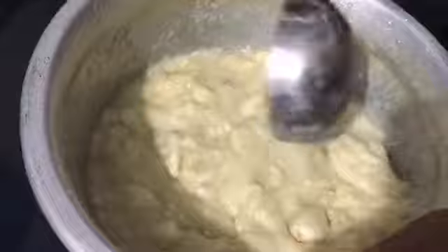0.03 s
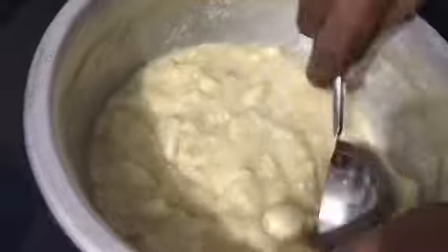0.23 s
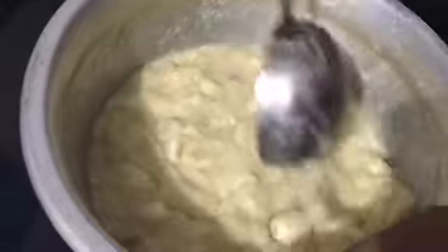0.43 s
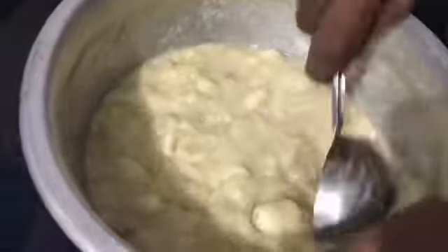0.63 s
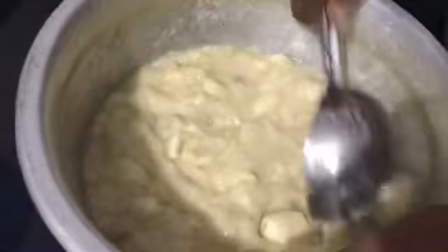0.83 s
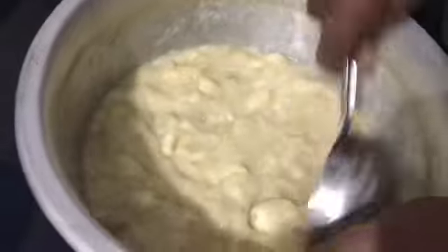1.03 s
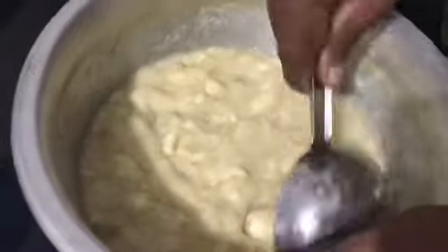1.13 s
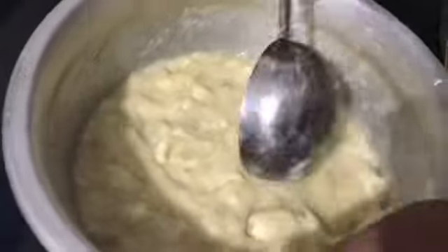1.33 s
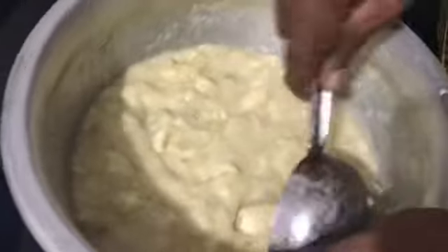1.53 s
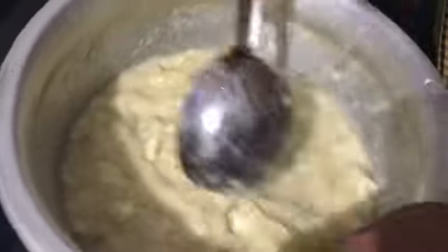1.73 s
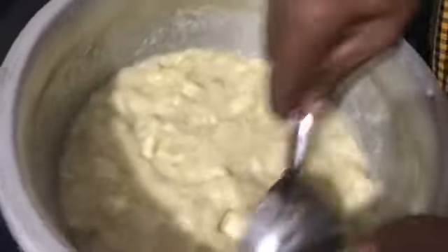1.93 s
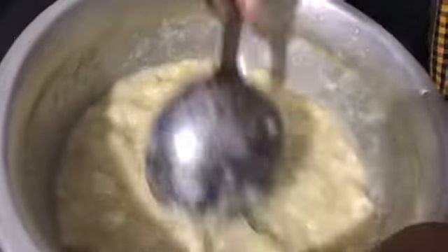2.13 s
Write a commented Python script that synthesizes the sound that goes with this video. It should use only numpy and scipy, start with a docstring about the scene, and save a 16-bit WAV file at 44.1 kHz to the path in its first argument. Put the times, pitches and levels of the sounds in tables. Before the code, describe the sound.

Close up in a small kitchen, a metal ladle strikes a filled metal pot five times as it mashes. Sticky ticks and tiny pops come between the knocks, and the ladle briefly skids along the wall, over a low rumble.

```python
"""A steel ladle mashes a soft mixture in a metal pot, five strokes, close by in a small kitchen.
Over a low rumble and faint hiss, the mash ticks and smacks. Each stroke ends in a knock that the
filling damps quickly; from the second on, the edge also clacks on the bare wall at times.
Around the third, an arm pushes air by and the edge slides lightly down the wall.
The fourth skids along the wall. An air pocket pops after it, and another after the fifth."""
import sys
import numpy as np
from scipy import signal
from scipy.fft import rfft, irfft
from scipy.io import wavfile
from scipy.ndimage import uniform_filter1d

SR = 44100
rng = np.random.default_rng(int(sys.argv[2]) if len(sys.argv) > 2 else 0)


def to_wav(s):
    """Save 16-bit WAV."""
    ch = np.atleast_2d(s).T  # columns
    pcm = np.round(np.clip(ch, -1, 1) * 32767)  # PCM
    wavfile.write(sys.argv[1], SR, pcm.astype(np.int16))


N = 97020
T = np.arange(N) / SR

# modes of the filled pot and of the ladle: (frequency [Hz])
POT_HZ = [278, 370, 620, 678, 886, 1026, 1148, 1214, 1258, 1380, 1523]
LADLE_HZ = [1916, 2355, 2610, 2715, 2940, 3290, 3880, 4500, 5380, 5860, 8818]
# the same modes: (relative strength [dB], t60 [s])
POT_MODES = [(-8, 0.095), (-14, 0.094), (1, 0.07), (-12.5, 0.11), (-5.5, 0.056), (5, 0.059), (0.5, 0.16),
             (1.5, 0.087), (-3, 0.29), (-2, 0.22), (0, 0.069)]
LADLE_MODES = [(-5, 0.04), (5, 0.054), (0, 0.08), (0, 0.036), (1, 0.066), (-6.5, 0.084), (0.5, 0.044),
               (2, 0.02), (-4.5, 0.029), (0, 0.006), (6, 0.017)]


def amp(db):
    """Decibels to gain."""
    return 10 ** (np.asarray(db) / 20)


def unit(x):
    """Scale to rms 1."""
    return x / np.sqrt(np.mean(x ** 2) + 1e-20)


def read(points, hz):
    """Interpolate a spectrum table over log frequency."""
    f, value = np.transpose(points)
    return np.interp(np.log(hz + 1), np.log(f + 1), value)


def fade(times_s, levels_db):
    """Gain curve, silent outside its points."""
    return amp(np.interp(T, times_s, levels_db, left=-120, right=-120))


def add(mix, at_s, sound):
    """Mix a sound in, in place."""
    part = mix[round(at_s * SR):][:len(sound)]
    part += sound[:len(part)]


def colour(x, points, size=4096):
    """Minimum-phase filter from (frequency [Hz], gain [dB]) points."""
    log_gain = np.log(amp(read(points, abs(np.fft.fftfreq(size, 1 / SR)))))
    taps = np.fft.ifft(np.exp(np.conj(signal.hilbert(log_gain)))).real
    return signal.fftconvolve(x, taps[:size // 2])[:len(x)]


def noise(points):
    """Steady shaped noise, rms 1."""
    gain = amp(read(points, np.fft.rfftfreq(N, 1 / SR)))
    return unit(irfft(rfft(rng.standard_normal(N)) * gain, N))


def boost(x, hz, db, width_hz):
    """Raise one resonance."""
    return x + (amp(db) - 1) * signal.lfilter(*signal.iirpeak(hz, hz / width_hz, fs=SR), x)


def background(level_db=-44.5):
    """Steady low rumble and faint hiss."""
    # (frequency [Hz], relative density [dB])
    spectrum = [(15, 19), (30, 22.5), (65, 18), (110, 8), (200, 7), (400, 3.5), (800, 0), (1600, -3),
                (2500, -8), (3150, 2), (3900, -10.5), (7000, -16.5), (8800, -14), (10000, -23.5),
                (16000, -25)]
    return amp(level_db) * noise(spectrum)


def chatter(decay_s, rise_s=0.001, echo_above_hz=1870, size=16384):
    """A contact and a dying flurry of tiny ones, bouncing across the pot; energy 1."""
    # paths across the pot, varied per contact: (delay [s], gain [ratio])
    echoes = [(.0008, 0.51), (.00175, 0.93), (.0058, 0.32)]
    t = np.arange(size) / SR
    first_contact = 1 + 2 * np.exp(-t / 0.00024)
    envelope = np.exp(-t / decay_s) * first_contact * (1 - np.exp(-t / rise_s))
    spectrum = rfft(rng.standard_normal(size) * envelope)
    whitened = irfft(spectrum / (abs(spectrum) + 1e-9))
    direct = whitened * np.exp(-t / (10 * decay_s))
    treble = signal.lfilter(*signal.butter(2, echo_above_hz, "high", fs=SR), direct)
    burst = direct.copy()
    for delay_s, gain in echoes:
        add(burst, delay_s * rng.uniform(.8, 1.2), gain * treble)
    return burst / np.linalg.norm(burst)


def mash(pop_rise_s=0.00023, glide_per_s=6.2, octave_db=-13):
    """The sticky mash ticks; air pockets pop with rising pitch."""
    # wet ticks: (time [s], level at each of bands_hz [dB])
    smacks = [(0.0751, -29, -23, -5.5), (0.0837, -8, -5.5, -12), (0.2359, -23, -6, -6),
              (0.406, -11, -19, -33), (.419, -1.5, -43, -44), (.501, -30, -28, -19.5),
              (1.517, -13, -7, -16), (1.772, -21, -21, -21.5), (1.816, -9, -7, -25), (1.827, 0, -2.5, -27),
              (1.958, -5, -35, -10)]
    bands_hz = [1000, 3800, 11000]
    # air pockets: (time [s], start pitch [Hz], level [dB], t60 [s])
    pops = [(1.5635, 1677, -23, 0.02), (1.9418, 1414, -21, 0.021)]
    out, t = np.zeros(N), np.arange(SR // 10) / SR
    for at_s, *bands_db in smacks:
        tick = chatter(decay_s=0.0016, rise_s=0.0001)
        add(out, at_s, colour(tick, list(zip(bands_hz, bands_db))))
    for at_s, hz, db, t60_s in pops:
        phase = 2 * np.pi * hz * t * (1 + glide_per_s * t / 2)
        tone = np.sin(phase) + amp(octave_db) * np.sin(2 * phase)
        envelope = (1 - np.exp(-t / pop_rise_s)) * amp(db - 60 * t / t60_s)
        add(out, at_s, envelope * tone)
    return out


def ring(modes_hz, modes, place_rad, place_depth_db=3.5, size=16384):
    """Dying metal modes, energy 1; the place of the blow favours some."""
    t = np.arange(size) / SR
    tone = np.zeros(size)
    for k, (hz, (db, t60_s)) in enumerate(zip(modes_hz, modes)):
        strength_db = db + place_depth_db * np.cos(k * place_rad)
        envelope = amp(strength_db - 60 * t / t60_s) / np.sqrt(t60_s)
        tone += (-1) ** k * envelope * np.sin(2 * np.pi * hz * t)
    return tone / np.linalg.norm(tone)


def knocks(gain_db=-3, pot_db=-11, ladle_db=-7, bass_corner_hz=266, bass_db_per_octave=10):
    """The ladle hits the pot through the mash; each blow chatters and rings both."""
    # (time [s], rise [s], chatter decay [s], pot ring [dB], ladle ring [dB], place on wall [rad],
    # thud [Hz], belly [dB], wall note [Hz], wall note [dB], clink [Hz], clink [dB],
    # gain at each of bands_hz [dB])
    blows = [ (0.1614, 0.00039, 0.0027, -2, -3.5, 1.73, 374, 7, 1140, 5.2, 4470, 9.9, 14, 22.2, 26, 3, 11.5, 8),
             (0.567, 0.0018, 0.0023, -1.5, -16, 0.9, 385, 2, 1166, 8.7, 4330, 6.7, 16.5, 18.8, 17.9, 9.1, 5.5, 7.5),
             (0.9906, 0.00054, 0.0019, -1, -19, 3.1, 270, 2, 1260, 2.9, 5350, 2.7, 18, 13, 16.4, 2, 10, 0.5),
             (1.0058, 0.00038, 0.0035, -5, -16, 3.1, 274, -1.5, 1000, 4, 2900, 7.2, 8.4, 16.6, 16.8, 2, -13, -0.5),
             (1.3858, 0.0046, 0.0042, 4.5, -4.5, 2.64, 280, 5, 1240, 2.9, 4380, 6.1, 17.8, 9.9, 15.2, 15, 17, 12.5),
             (1.8380, 0.00042, 0.004, -0.5, -1.5, 1.4, 322, 0, 990, 10.4, 4070, 9, 25.1, 19.2, 23.1, 13.8, 13, 12)]
    bands_hz = [330, 660, 1300, 2200, 4700, 12000]
    # broad response of the filled pot: (frequency [Hz], gain [dB])
    pot_body = [(140, 9.5), (200, -8), (280, -2.5), (390, 1.5), (480, -4.5), (630, 5.5), (830, -0.5),
                (1040, 6), (1300, 2), (1580, 4.5), (2050, -4), (2750, 2.5), (3450, -6), (5500, 0.5),
                (7300, -1.5), (16000, 1.5)]
    out = np.zeros(N)
    for (at_s, rise_s, decay_s, pot_ring_db, ladle_ring_db, place_rad,
         thud_hz, belly_db, note_hz, note_db, clink_hz, clink_db, *bands_db) in blows:
        blow = colour(chatter(decay_s, rise_s), pot_body)
        # resonances vary with the point of contact
        blow = boost(blow, hz=663.5, db=belly_db, width_hz=50)
        blow = boost(blow, thud_hz, db=7, width_hz=68)
        blow = boost(blow, note_hz, note_db, width_hz=84)
        blow = boost(blow, clink_hz, clink_db, width_hz=193)
        blow += amp(pot_db + pot_ring_db) * ring(POT_HZ, POT_MODES, place_rad)
        blow += amp(ladle_db + ladle_ring_db) * ring(LADLE_HZ, LADLE_MODES, place_rad)
        bass = [(bass_corner_hz / 4, bands_db[0] - 2 * bass_db_per_octave),
                (bass_corner_hz, bands_db[0])]
        add(out, at_s, colour(blow, bass + list(zip(bands_hz, bands_db))))
    return amp(gain_db) * out


def clacks(place_rad=2.28):
    """Light, bright contacts of the ladle's edge with the bare wall."""
    # (time [s], chatter decay [s], ladle ring [dB], clink [Hz], gain at each of bands_hz [dB])
    contacts = [(0.54, 0.0018, -20, 1790, 4.5, -1.5, -3.5), (0.9461, 0.0024, -12.5, 1930, 4.7, 11, 1),
                (1.3812, 0.00092, -8, 3900, 6.7, 9, -11), (1.4060, 0.00097, -17, 8850, 5, -15, -11),
                (1.4290, 0.00096, -17, 5400, 2.5, -2, -11), (1.4530, 0.0052, -28, 4700, 4, -5, -12),
                (1.4615, 0.003, -12, 5400, 2, 0, -12), (1.4707, 0.0014, -12.5, 5330, 7.3, 4, -8.5)]
    bands_hz = [800, 4000, 12000]
    # response of the bare wall: (frequency [Hz], gain [dB])
    wall_body = [(150, -8), (380, -5.5), (540, 3.5), (1000, 5), (1250, -7), (1550, -8), (1880, 2.5),
                 (2150, -5), (2720, -3), (4200, 0), (5800, 2.5), (7400, -6), (9500, 1), (13000, 3.5),
                 (16000, -7)]
    out = np.zeros(N)
    for at_s, decay_s, ring_db, clink_hz, *bands_db in contacts:
        blow = colour(chatter(decay_s), wall_body)
        blow = boost(blow, clink_hz, db=10, width_hz=193)
        blow += amp(ring_db) * ring(LADLE_HZ, LADLE_MODES, place_rad)
        add(out, at_s, colour(blow, list(zip(bands_hz, bands_db))))
    return out


def buffet():
    """An arm passing close by pushes air; the pitch sinks as it swells."""
    # (time [s], deep bass level [dB], upper bass level [dB])
    swell = [(.76, -56, -43), (.78, -52, -39), (.83, -35.5, -34.5), (0.881, -28, -44), (0.928, -35, -73),
             (1.0, -55, -58), (1.108, -37, -45.5), (1.201, -67, -68)]
    # air spectra: (frequency [Hz], relative density [dB])
    deep_bass = [(15, -36), (33, -17), (48, 2), (70, -5), (150, -51), (600, -76)]
    upper_bass = [(30, -35), (80, 2), (115, 0.5), (165, -11), (240, -30), (600, -69)]
    times_s, *curves_db = np.transpose(swell)
    out = np.zeros(N)
    for levels_db, spectrum in zip(curves_db, (deep_bass, upper_bass)):
        air = noise(spectrum)
        local_rms = np.sqrt(uniform_filter1d(air ** 2, size=1400) + 0.03)
        out += fade(times_s, levels_db) * unit(air / local_rms)
    return out


def slips(rate_per_s=450, spread_db=5.5):
    """Dense train of tiny, uneven stick-slip jolts."""
    signs = rng.choice([-1, 1], N)
    sizes = amp(spread_db * np.minimum(rng.exponential(1, N), 3))
    return signs * sizes * (rng.random(N) < rate_per_s / SR)


def slide():
    """The edge slides lightly down the wall between two contacts: a thin scrape."""
    # (time [s], level [dB])
    levels = [(0.952, -49), (0.965, -40), (0.989, -37)]
    # (frequency [Hz], gain [dB])
    response = [(1500, -29), (4300, -11), (5300, -7), (6200, 5), (7200, -20), (16000, -20)]
    scrape = signal.fftconvolve(slips(), chatter(decay_s=0.0014))[:N]
    return fade(*np.transpose(levels)) * unit(colour(scrape, response))


def rub(place_rad=1.74, ladle_db=-8, pot_db=-18):
    """The ladle skids along the wall; its slips ring ladle and pot."""
    # (time [s], level [dB])
    levels = [(1.376, -42.5), (1.39, -29), (1.41, -35), (1.447, -41), (1.458, -27), (1.478, -30),
              (1.486, -44), (1.53, -53), (1.56, -66)]
    # (frequency [Hz], gain [dB])
    response = [(100, 1.5), (480, -5), (640, 6.5), (1400, -1), (2100, -18), (2700, -14), (4200, -16),
                (5400, -10), (6500, -19.5), (16000, -12)]
    body = chatter(decay_s=0.0014)
    body += amp(ladle_db) * ring(LADLE_HZ, LADLE_MODES, place_rad)
    body += amp(pot_db) * ring(POT_HZ, POT_MODES, place_rad)
    scrape = signal.fftconvolve(slips(), body)[:N]
    return fade(*np.transpose(levels)) * unit(colour(scrape, response))


def kitchen(x, delay_s=0.0011, size=32768):
    """Dense room echo, each band dying at its own rate."""
    # (frequency [Hz], t60 [s])
    decay_times = [(150, 0.69), (600, 0.51), (1300, 0.47), (3500, 0.51), (8000, 0.4), (16000, 0.31)]
    # (frequency [Hz], gain [dB])
    response = [(150, -0.5), (460, -6.5), (660, -3), (1000, -8), (1380, -8.5), (2000, -8.5), (5000, -8),
                (10000, -7.5), (16000, -7.5)]
    hz, t, bands = signal.stft(rng.standard_normal(size), SR, nperseg=256)
    t60_s = read(decay_times, hz)[:, None]
    equal_energy = np.sqrt(2 * np.log(1000) / (t60_s * SR))
    tail = signal.istft(bands * amp(-60 * t / t60_s) * equal_energy, SR, nperseg=256)[1]
    onset = np.clip(np.arange(len(tail)) / SR / delay_s - 1, 0, 1)
    return signal.fftconvolve(x, colour(tail * onset, response))[:N]


def smeared(x, above_hz=4800, width_hz=300):
    """Random phase drift blurs an echo's treble partials into hiss."""
    hz = np.fft.rfftfreq(N, 1 / SR)
    treble = irfft(rfft(x) / (1 + (above_hz / (hz + 1)) ** 20), N)
    drift_rad = np.cumsum(rng.standard_normal(N)) * np.sqrt(2 * np.pi * width_hz / SR)
    blurred = signal.hilbert(treble) * np.exp(1j * uniform_filter1d(drift_rad, size=16))
    return x - treble + blurred.real


def scene(light_send_db=-2, stroke_s=0.42):
    """Pot sounds, a fresh kitchen echo per stroke, air push and background; mono."""
    heavy = knocks() + rub()
    light = clacks() + mash() + slide()
    send = heavy + amp(light_send_db) * light
    stroke = T // stroke_s
    room = sum(kitchen(send * (stroke == k)) for k in np.unique(stroke))
    return (heavy + light + smeared(room) + buffet() + background())[None]


def record(dry, cutoff_hz=16000):
    """Low-pass band limit."""
    taps = signal.firwin(511, cutoff_hz, window=("kaiser", 9), fs=SR)
    return signal.oaconvolve(dry, taps[None], "same")


dry = scene()
out = record(dry)
to_wav(out)
```